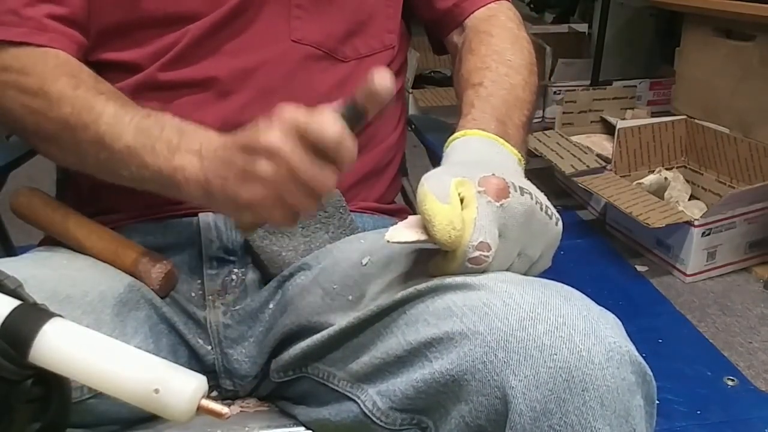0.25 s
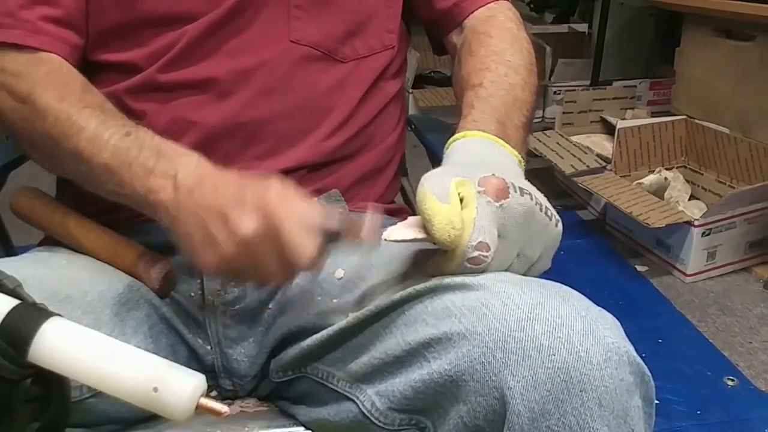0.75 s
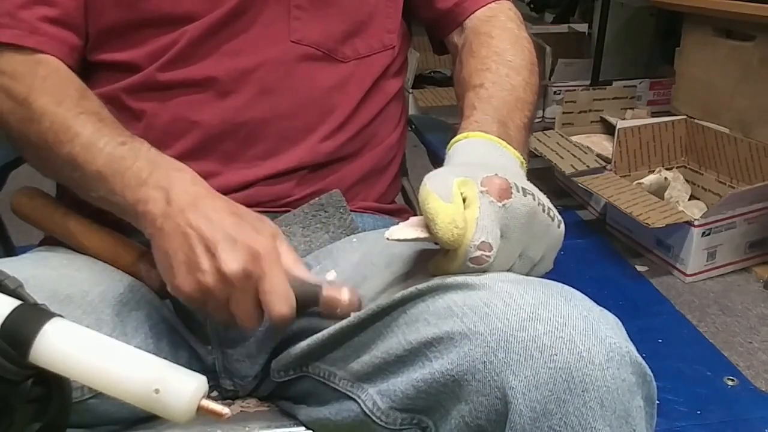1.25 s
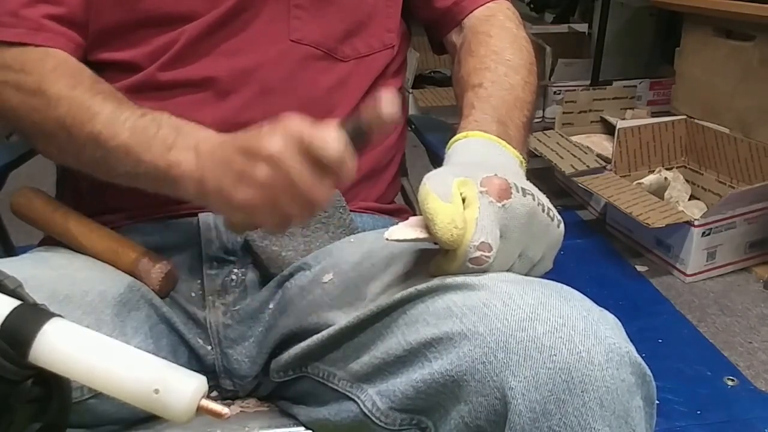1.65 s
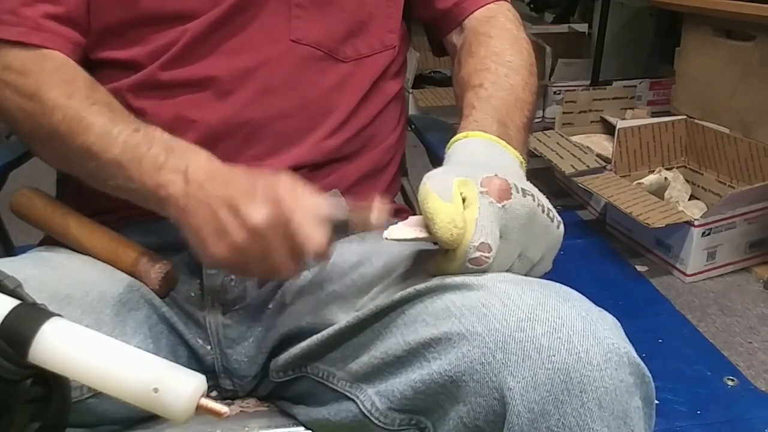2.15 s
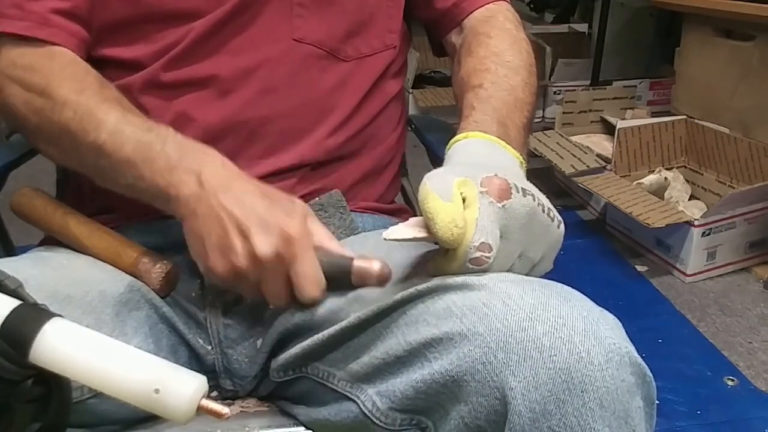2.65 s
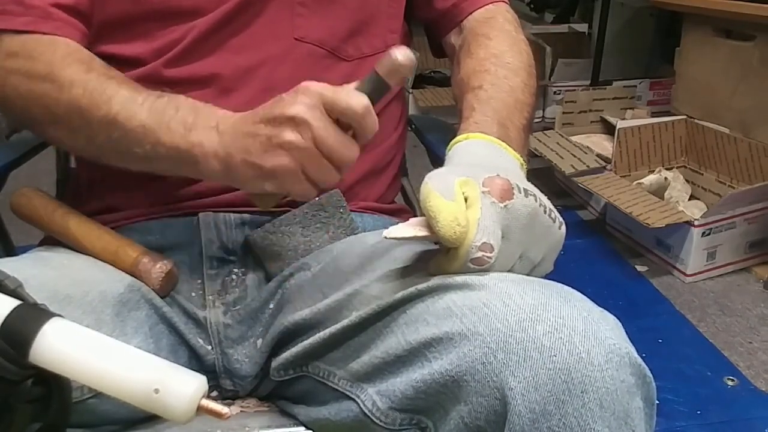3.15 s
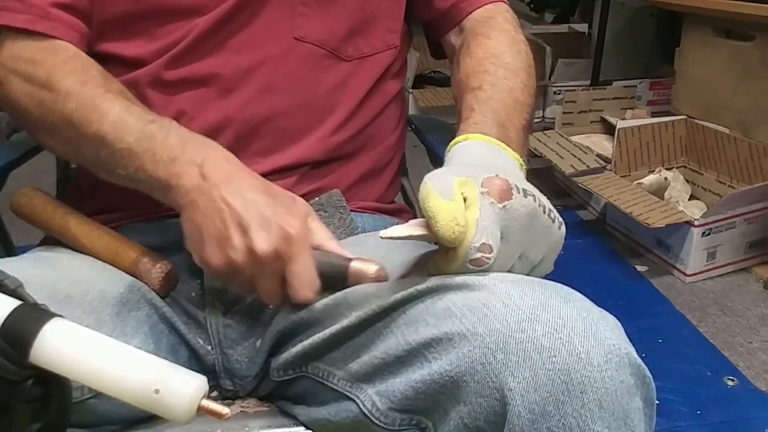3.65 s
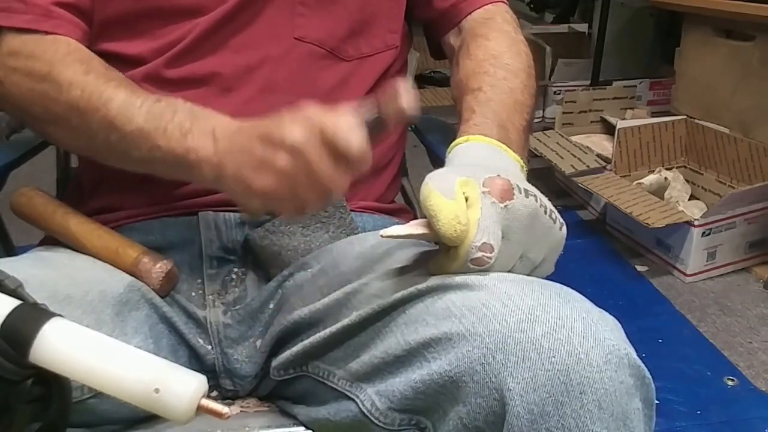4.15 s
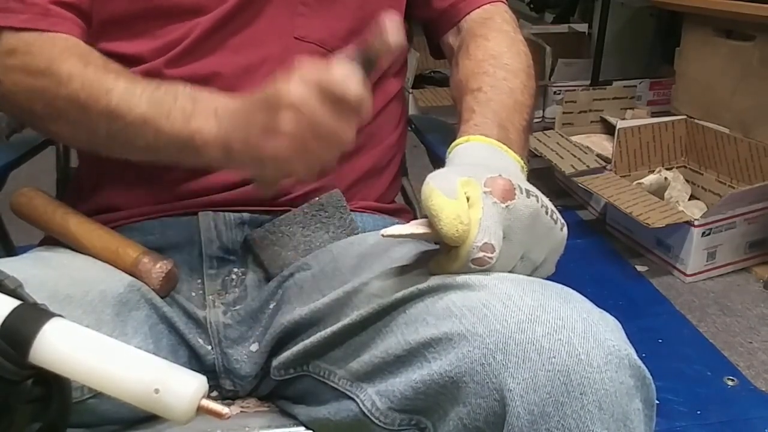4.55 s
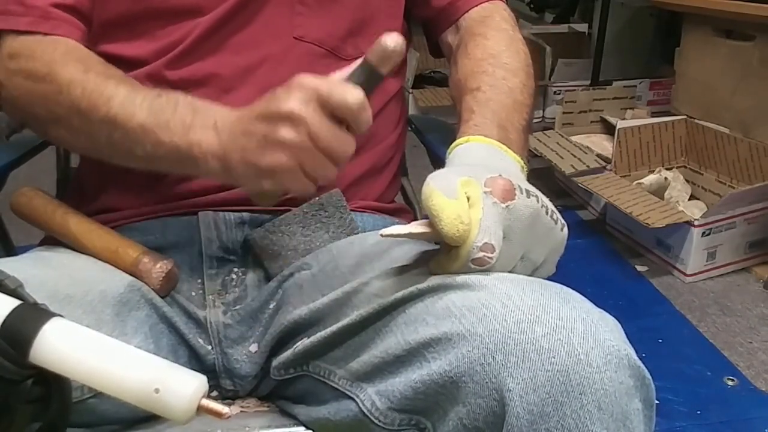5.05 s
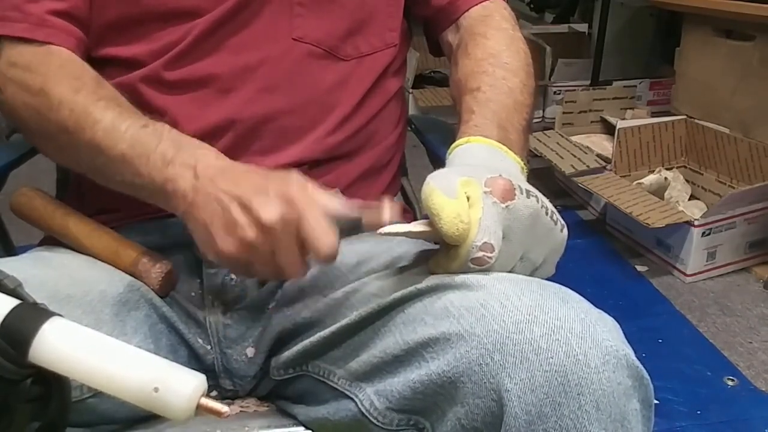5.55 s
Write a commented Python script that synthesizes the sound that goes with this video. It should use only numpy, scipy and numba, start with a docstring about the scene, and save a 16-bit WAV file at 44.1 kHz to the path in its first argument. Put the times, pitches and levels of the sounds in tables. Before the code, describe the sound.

Sharp clicks with a brief high metallic ring repeat as a small hand tool chips a stone's edge, over a faint machine hum.

```python
"""A small cluttered workshop, one microphone close to a flint held on the knee.
A copper-tipped billet strikes the flint's edge: each blow rings the tip, cracks through the stone and
echoes off lap, floor and walls. Flakes drop and scuff between blows, and cloth and grit rustle at the
end, all over a low machine hum. The recorder's limiter holds the loudest blows down."""
import sys
import numpy as np
from scipy import signal
from scipy.fft import rfft, irfft, next_fast_len
from scipy.io import wavfile
from scipy.ndimage import uniform_filter1d, minimum_filter1d
from numba import njit

SR = 44100
rng = np.random.default_rng(int(sys.argv[2]) if len(sys.argv) > 2 else 0)


def store_pcm(level_fs):
    """Save levels as 16-bit WAV."""
    pcm = np.round(np.clip(level_fs, -1, 1) * 32767).astype(np.int16)
    wavfile.write(sys.argv[1], SR, np.atleast_2d(pcm).T)


N = 255339
SPAN = 9000  # samples given to one contact
AGE = np.arange(SPAN) / SR  # seconds since that contact

# Blows at the knee. Each row: start in seconds, then tip, stone and fizz energy in dB.
BILLET_BLOWS = [(0.082, 29, 0.5, 20.5), (0.4077, 24.5, 6.5, 16.5), (0.7236, 12.5, 3, 2),
                (1.0206, 9, -22, 2.5), (1.31, 18.5, -15, 3.5), (1.8631, 17, 3, -7), (2.4343, 19.5, -2, 9.5),
                (2.7287, 11.5, 3.5, -8.5), (3.036, 19, 3, 6.5), (3.3574, 27, -4, 10.5),
                (3.7172, 20, 4.5, 13), (4.0715, 13, 5, 6), (4.4355, -2, 0, -2), (4.8256, 23.5, 7.5, 12),
                (5.254, 18.5, 6.5, -26.5)]

def blows():
    """Each blow rings tip and stone, cracks, and sends a soft low jolt through the lap."""
    out = np.zeros(N)
    jolt = tone(hz=48.2, t60=.072) * (1 - np.exp(-AGE / .0013))
    for start, tip_db, stone_db, fizz_db in BILLET_BLOWS:
        weight_db = .31 * stone_db  # thud and jolt grow more slowly than the stone
        thud_db, crack_db = weight_db - 8, stone_db + 1.5
        add(out, undb(tip_db) * copper_tip(), start)
        add(out, undb(stone_db + 5) * flint_clink(), start)
        add(out, contact([thud_db, stone_db, crack_db, fizz_db], ms=.026, tail_db=-21.5), start)
        add(out, undb(weight_db - 52) * jolt, start)
    return out


# The tip's modes. Each row: offset from TIP_HZ in Hz, relative level in dB, t60 in seconds.
TIP_MODES = [(0, 0, .075), (-84, -14, .07), (138, -21, .05), (-225, -26, .05), (-335, -29, .05),
             (-425, -29, .05), (215, -28, .05), (300, -28, .05)]
TIP_HZ = 12900

def copper_tip():
    """The copper rings high, its close modes beating as they fade."""
    modes = [(TIP_HZ + offset, db, t60) for offset, db, t60 in TIP_MODES]
    return ring(modes, scatter_db=4.2, blur_db=-23)


# The flint's modes. Each entry: frequency in Hz in the first list, relative level in dB in the second.
FLINT_HZ = [3860, 4315, 4420, 4565, 4783, 5037, 5570, 6775, 8320]
FLINT_DB = [-11, -4.5, -7, -2.5, -1, -1.5, -5.5, -3.5, -2.5]
FLINT_T60_S = .015

def flint_clink():
    """The struck stone's modes die almost at once, leaving a short clink."""
    modes = [(hz, db, FLINT_T60_S) for hz, db in zip(FLINT_HZ, FLINT_DB)]
    return ring(modes, scatter_db=3, blur_db=-28)


def ring(modes, scatter_db, blur_db):
    """Decaying modes, shared out anew by each blow and blurred a little by the room."""
    shares_db = scatter_db * rng.standard_normal(len(modes))
    ringing = sum(undb(db + share) * tone(hz, t60) for (hz, db, t60), share in zip(modes, shares_db))
    ringing *= 1 - np.exp(-AGE / .00014)  # the push takes a moment
    return unit_energy(room(ringing, t60=.089, tail_db=blur_db, echo_db=-8.5))


# A contact's thud, stone, crack and fizz bands. Each row: centre in Hz, width in Hz.
CONTACT_BANDS = [(1900, 3100), (4950, 1900), (8600, 4200), (13300, 7130)]
# The room's tail in those bands. Each entry: t60 in seconds.
BAND_T60_S = [.11, 0.078, 0.098, 0.088]

def contact(levels_db, ms, tail_db, echo_db=0):
    """A short gritty push, coloured by four broad resonances, each with its own room tail."""
    grit = rng.standard_normal(SPAN) * np.exp(-AGE * 1000 / ms)
    out = np.zeros(SPAN)
    for db, (hz, width), t60 in zip(levels_db, CONTACT_BANDS, BAND_T60_S):
        heard = band(room(grit, t60, tail_db, echo_db), hz, width)
        out += undb(db) * unit_energy(heard)
    return out


# Rebounds, landings and scuffs. Each row: start in seconds, thud and fizz energy in dB, decay in ms.
SMALL_CONTACTS = [(0.0983, -11, -22, 0.017), (0.1083, -20, -22, 0.018), (0.16, -31, -18, 0.042),
                  (0.194, -44, -26, 0.027), (0.356, -36, -28.5, 0.044), (0.741, -14.5, -45, 1),
                  (1.0384, -16, -40, 2.7), (1.1504, -25.5, -16.5, 0.01), (1.2447, -40, -20.5, 0.037),
                  (1.282, -55, -36, 4), (1.332, -18.5, -40, 1.4), (1.61, -19, -15, 5),
                  (1.67, -35, -22.5, 0.098), (2.1725, -21.5, -17.5, 8.7), (2.6752, -40, -13, 0.024),
                  (3.064, -26, -25, 0.018), (3.3985, -36, -11, .02), (3.5264, -32, -15.5, 4.3),
                  (3.591, -36, -26.5, 12), (3.9503, -49, -35, .1), (4.157, -56, -34, 2),
                  (4.288, -57.5, -34.5, 2.6), (4.7018, -34, -22.5, 0.18), (4.957, -33, -60, 4),
                  (5.3345, -27.5, -17, 0.044), (5.4341, -16, -18.5, 0.03), (5.494, -24, -21, 48),
                  (5.583, -18, -16, 5.4)]
# These hardly stir the middle bands. The entries: stone dip in dB, crack dip in dB.
MID_DIP_DB = [-7.5, -11]
# A ringing flake. Its row: start in seconds, frequency in Hz, level in dB, t60 in seconds.
FLAKE_RINGS = [(3.573, 15000, -34, 0.041)]

def flakes():
    """Small chips tick on cloth and floor; longer contacts scuff; one flake rings."""
    out = np.zeros(N)
    for start, thud_db, fizz_db, ms in SMALL_CONTACTS:
        levels_db = np.linspace(thud_db, fizz_db, len(CONTACT_BANDS)) + [0, *MID_DIP_DB, 0]
        # low in the lap, they barely reach the near reflectors
        add(out, contact(levels_db, ms, tail_db=-27, echo_db=-13), start)
    for start, hz, db, t60 in FLAKE_RINGS:
        add(out, undb(db) * tone(hz, t60), start)
    return out


def rustle(start_s=5.436, end_s=5.6, fade_s=.033, level_db=-60.5):
    """Cloth and grit rustle in dense tiny grains, spread evenly up through the treble."""
    grains = rng.standard_normal(N) * undb(3.5 * rng.exponential(size=N))
    grains = band(grains, hz=8000, width=15600)
    t = np.arange(N) / SR
    envelope = (t > start_s) * np.exp(-np.maximum(t - end_s, 0) / fade_s)
    return undb(level_db) * envelope * grains / grains.std()


# Echoes off nearby surfaces. Each row: delay in ms, relative level in dB.
NEAR_ECHOES = [(3.3, -1), (6.6, -8), (9.5, -12), (12.5, -14)]

def room(sound, t60, tail_db, echo_db):
    """Sound reaches the microphone directly, by near echoes and in a quickly building diffuse tail."""
    build = 1 - np.exp(-AGE / .002)
    path = undb(tail_db) * build * fade(t60) * rng.standard_normal(SPAN)
    path[0] += 1  # direct sound
    scatter_db = 1.5 * rng.standard_normal(len(NEAR_ECHOES))
    for (ms, db), extra_db in zip(NEAR_ECHOES, scatter_db):
        path[int(ms * SR / 1000)] += undb(db + extra_db + echo_db)
    return signal.fftconvolve(sound, path)[:SPAN]


# The workshop's background noise. Each row: frequency in Hz, relative spectral density in dB.
HUM_SPECTRUM = [(15, -80), (25, -35), (59, -26.5), (144, 2), (178, -5.5), (204, -2.5), (233, -11.5),
                (445, -19), (495, -24), (871, -25.5), (945, -26.5), (1300, -30.5), (2360, -33),
                (3090, -37.5)]

def hum(bed_db=-49.5, drone_db=-66.5, swell_db=2, swells_per_s=16):
    """Low machine rumble that swells unevenly, a narrow drone and microphone hiss."""
    hz, db = np.transpose(HUM_SPECTRUM)
    size = next_fast_len(N)
    bin_hz = np.arange(size // 2 + 1) * SR / size + 1
    shape = undb(np.interp(np.log(bin_hz), np.log(hz), db))
    bed = irfft(rfft(rng.standard_normal(size)) * shape, size)[:N]
    bed *= undb(bed_db) / bed.std()
    hold = int(SR / swells_per_s)
    steps = np.repeat(rng.standard_normal(N // hold + 1), hold)[:N]
    swell = undb(swell_db * uniform_filter1d(steps, hold))
    rumble = band(bed, hz=229, width=740)  # only this low part swells
    drone = band(rng.standard_normal(N), hz=351.2, width=17)
    return bed + rumble * (swell - 1) + undb(drone_db) * drone / drone.std()


def undb(db):
    """dB to gain."""
    return 10 ** (np.asarray(db) / 20)


def fade(t60):
    """Exponential decay, 60 dB in t60 seconds."""
    return np.exp(-np.log(1000) * AGE / t60)


def tone(hz, t60):
    """One decaying mode."""
    return np.sin(2 * np.pi * hz * AGE) * fade(t60)


def band(x, hz, width):
    """Band-pass around hz, its lower edge no lower than 60 Hz."""
    edges = max(hz - width / 2, 60), min(hz + width / 2, .45 * SR)
    return signal.sosfilt(signal.butter(2, edges, "band", fs=SR, output="sos"), x)


def unit_energy(x):
    """Scale to a total energy of 1."""
    return x / np.sqrt(np.sum(x ** 2))


def add(out, x, start_s):
    """Mix x into out from start_s."""
    i = int(start_s * SR)
    out[i:i + SPAN] += x[:min(SPAN, N - i)]


@njit
def follow_peaks(x, release):
    """Peak level that jumps up at once and sinks gradually."""
    peaks, level = np.empty(len(x)), 1e-9
    for i in range(len(x)):
        level = max(abs(x[i]), level * release)
        peaks[i] = level
    return peaks


def scene():
    """Everything at the one close microphone."""
    return (blows() + flakes() + rustle() + hum())[None]


LIMIT_DB, RELEASE_S, AHEAD_S, TOP_HZ = -1.2, .006, .0004, 15730

def record(dry):
    """The recorder's limiter looks a little ahead and ducks the peaks; then the top treble is cut."""
    peaks = follow_peaks(dry[0], np.exp(-1 / (RELEASE_S * SR)))
    gain = np.minimum(1, undb(LIMIT_DB) / peaks)
    ahead = int(AHEAD_S * SR)
    gain = uniform_filter1d(minimum_filter1d(gain, 2 * ahead), ahead)
    lowpass = signal.ellip(12, .2, 70, TOP_HZ, fs=SR, output="sos")
    return np.clip(signal.sosfilt(lowpass, gain * dry[0]), -1, 1)[None]


dry = scene()
out = record(dry)
store_pcm(out)
```